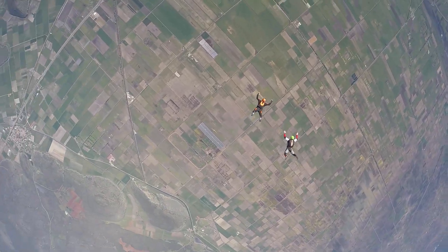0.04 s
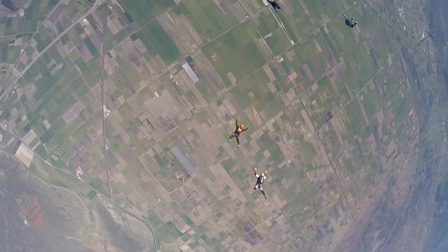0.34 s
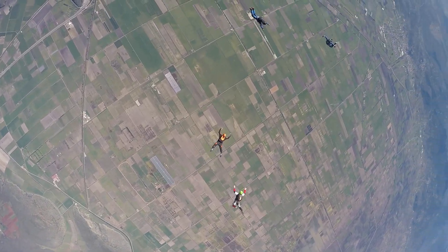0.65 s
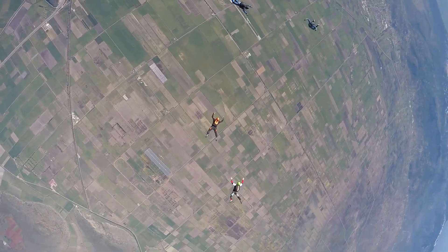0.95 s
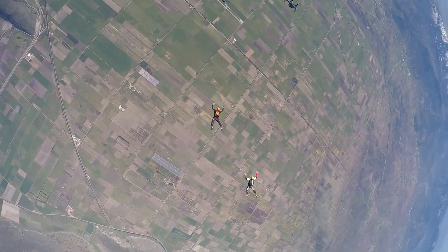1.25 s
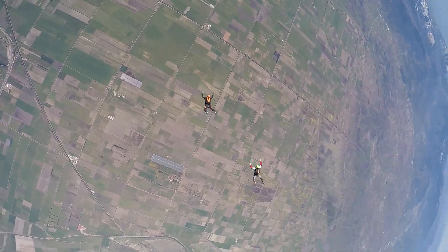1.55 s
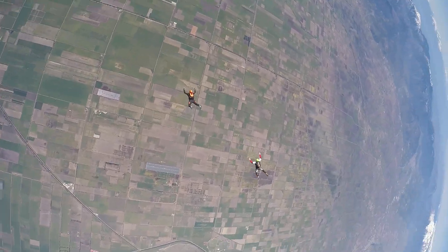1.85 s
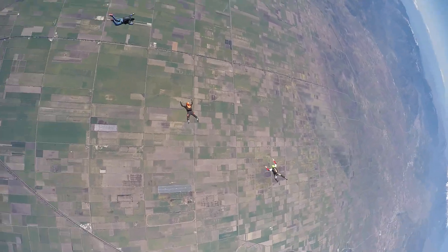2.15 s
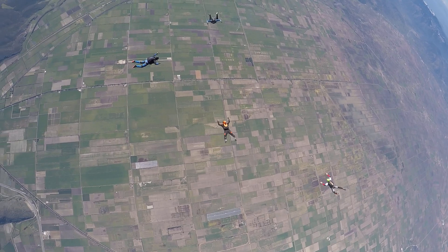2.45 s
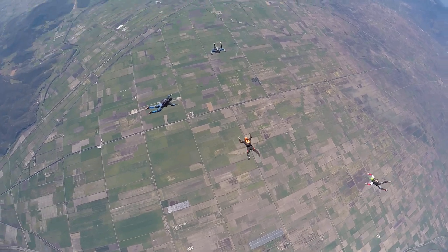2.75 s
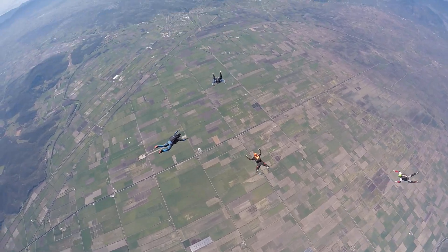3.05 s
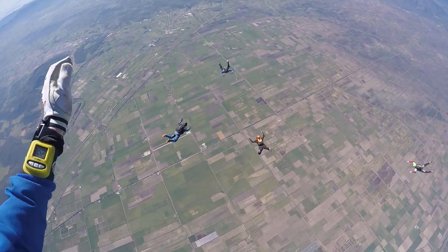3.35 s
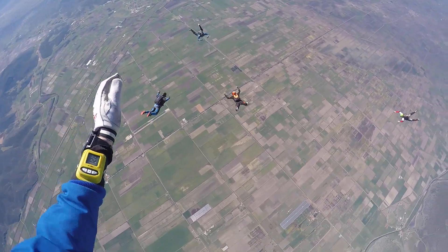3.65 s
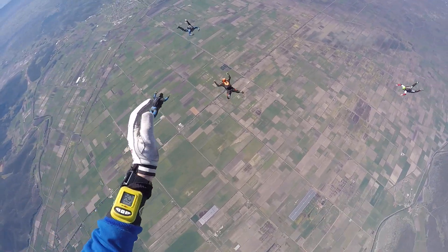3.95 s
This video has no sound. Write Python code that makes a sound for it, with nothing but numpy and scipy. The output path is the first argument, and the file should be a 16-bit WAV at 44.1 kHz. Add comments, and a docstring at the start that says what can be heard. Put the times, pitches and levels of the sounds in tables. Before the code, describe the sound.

Rushing freefall wind buffets the microphone with a deep rumble, broad roar and whistling hiss.

```python
"""A deep rumble and a broad roar of wind: air is rushing past a skydiver's camera in freefall.
Swirls of air shake the case, the stream makes a small hollow at the microphone ring near 3 kHz,
and the finest swirls add a hiss on top. As the diver turns, the roar swells and the ringing
breaks up into sputtering bursts, then drops away."""
import sys
import numpy as np
from scipy import signal
from scipy.fft import rfft, irfft
from scipy.io import wavfile
from scipy.ndimage import uniform_filter1d, minimum_filter1d

SR = 44100
rng = np.random.default_rng(int(sys.argv[2]) if len(sys.argv) > 2 else 0)


def materialize(psi):
    """Save the field psi as 16-bit PCM at rate SR to the path in sys.argv[1].

    A 1-D psi becomes a single channel; in a 2-D psi each row is a channel.
    """
    bounded = np.clip(np.atleast_2d(psi).T, -1, 1)
    quanta = np.round(bounded * 32767).astype(np.int16)
    wavfile.write(sys.argv[1], SR, quanta)


N = 176400  # 4 seconds

# Tone of the ringing hollow, how strong each pitch is: pitch_hz, level_db
HOLLOW_TONE = [(500, -48), (1600, -21.5), (2000, -18.5), (2200, -8), (2430, -3.5), (2700, -3), (2900, -2.2),
               (3200, -1.5), (3500, -8.5), (3900, -16), (4350, -25), (6000, -34.5), (9000, -51)]
# The pitch at which the hollow rings most: pitch_hz, width_hz, boost_db
HOLLOW_PEAKS = [(2900, 130, 2)]
HOLLOW_STEADINESS = 0.7  # 0 leaves random swells alone, 1 evens them out
SWIRL_HZ, SPUTTER_HZ, GRAIN_HZ = 52, 47, 410  # how fast each kind of flutter moves


def from_db(db):
    """Turn decibels into a number to multiply the sound by."""
    return 10 ** (np.asarray(db) / 20)


def unit_power(x):
    """Scale a signal so that its average power is 1."""
    return x / np.sqrt(np.mean(x ** 2) + 1e-20)


def curve(rows):
    """Join (time_s, value) points with straight lines, giving a value for every sample."""
    return np.interp(np.arange(N) / SR, *np.transpose(rows))


def drift(rate_hz):
    """A smooth random wander about 1 in size, worked out at every 8th sample."""
    pole = np.exp(-16 * np.pi * rate_hz / SR)
    noise = rng.standard_normal(N // 8 + 2002)
    slow = signal.lfilter([1], [1, -2 * pole, pole * pole], noise)[2000:]  # skip the settling time
    return np.interp(np.arange(N) / 8, np.arange(len(slow)), unit_power(slow))


def flutter(depth_db, rate_hz):
    """Passing swirls push the level up and down; the average power stays about the same."""
    spread = depth_db * np.log(10) / 20
    swirls = 2 * np.tanh(drift(rate_hz) / 2)  # a swirl can only be so strong
    return np.exp(spread * swirls - .75 * spread ** 2)


def air_noise(tone, drive=1, peaks=()):
    """Churning air: noise whose strength follows the drive, shaped by a tone and narrow peaks."""
    hz = np.maximum(np.arange(N // 2 + 1) * SR / N, 1)
    pitch_hz, level_db = np.transpose(tone)
    db = np.interp(np.log(hz), np.log(pitch_hz), level_db)
    for centre_hz, width_hz, boost_db in peaks:
        db = db + boost_db / (1 + (2 * (hz - centre_hz) / width_hz) ** 2)
    spectrum = rfft(drive * rng.standard_normal(N))
    low_cut = hz / np.hypot(hz, 10)  # fades out below 10 Hz
    return unit_power(irfft(spectrum * from_db(db) * low_cut, N))


def steadied(x, window_s, steadiness):
    """Partly even out swells slower than the window; quicker ones stay."""
    power = uniform_filter1d(x ** 2, int(window_s * SR)) + 1e-12
    return unit_power(x / power ** (steadiness / 2))


def rumble():
    """Large swirls shake the case without pause, so the lumpy bass keeps a fairly even strength."""
    # Tone of the shaking: pitch_hz, level_db
    tone = [(10, -20), (20, -4), (32, 3), (60, 0.4), (95, -1.2), (127, 0), (148, -14), (185, -22.5),
            (270, -33), (600, -66)]
    # How hard the air shakes the case: time_s, level_db
    shaking = [(0, -16.5), (.2, -17.5), (.36, -15), (.5, -18.5), (.8, -20.5), (1.1, -24.5), (1.4, -19),
               (1.7, -19.5), (2.2, -18.5), (2.33, -16), (2.43, -19.5), (2.57, -13), (3, -15.5), (3.25, -14),
               (3.5, -12), (3.75, -19), (4, -17)]
    lumps = steadied(air_noise(tone), window_s=0.111, steadiness=0.69)
    return lumps * flutter(depth_db=0.4, rate_hz=SWIRL_HZ) * from_db(curve(shaking))


def roar():
    """Churning air roars over a wide range of pitches, with peaks near 200 Hz and 1.5 kHz."""
    # Tone of the roar: pitch_hz, level_db
    tone = [(60, -5), (170, 4), (220, 3.5), (330, -1.5), (480, -1.5), (700, -5.5), (1050, -2), (1220, -1.5),
            (1500, 3.5), (1950, -2), (2400, -2), (2900, -1.5), (3250, -5), (3650, -17), (4050, -11),
            (5000, -23), (9000, -36)]
    # How the churning swells and fades: time_s, relative_level_db
    churning = [(0, -24.5), (.2, -25), (.36, -27.5), (.55, -33), (.97, -37.5), (1.14, -36.5), (1.45, -29.5),
                (1.9, -30), (2.2, -26.5), (2.42, -22.5), (2.58, -17), (2.7, -19.5), (2.85, -23), (3.3, -20),
                (3.52, -24), (4, -24.5)]
    drive = flutter(depth_db=1.3, rate_hz=SWIRL_HZ)
    return air_noise(tone, drive) * from_db(2.5 + curve(churning))


def hollow_ring():
    """Grainy airflow rings the hollow, steadily at first, later in fits."""
    # Strength of the flow across the hollow: time_s, relative_level_db
    flow = [(0, -20), (.25, -17), (.5, -14.5), (.85, -14.5), (1.05, -16.5), (1.4, -16.5), (1.75, -16),
            (2.25, -16.5), (2.6, -21), (2.82, -19.5), (2.97, -27), (3.15, -24.5), (3.3, -23.5), (3.4, -18),
            (3.55, -20), (3.66, -23), (3.72, -36.5), (4, -36)]
    # How unsteady that flow is (further from 0 is rougher): time_s, depth_db
    sputter = [(0, 1.2), (2.4, 1.4), (2.75, 5.5), (3.6, 3), (4, -9)]
    drive = flutter(depth_db=1.5, rate_hz=GRAIN_HZ) * flutter(curve(sputter), SPUTTER_HZ)
    ringing = air_noise(HOLLOW_TONE, drive, HOLLOW_PEAKS)
    ringing = steadied(ringing, window_s=0.074, steadiness=HOLLOW_STEADINESS)
    return ringing * from_db(curve(flow) - 1)


def hiss():
    """The finest swirls hiss along the case and make it ring; the tone shifts as the diver turns."""
    # Tone of the hiss, facing down and after the turn: pitch_hz, level_db
    down_tone = [(1500, -0.5), (4000, 11.5), (4350, 5.5), (5100, 5.5), (5700, 5.5), (6700, 1), (7750, -1.5),
                 (9100, 1), (10200, 2), (11200, -2.5), (12650, -.3), (13400, -11), (15200, -11)]
    turned_tone = [(1500, -1), (4000, 16.5), (4350, 14), (5300, 4), (6000, 6), (6800, 6), (7750, 0),
                   (9100, 1.5), (10300, 2), (11300, -0.5), (12700, 1), (13800, -10), (15200, -18)]
    # Narrow peaks and dips that the case adds in each position: pitch_hz, width_hz, boost_db
    down_peaks = [(4640, 210, 9.5), (4950, 140, 3.5), (6310, 210, 5.5), (6600, 200, -3), (8070, 200, 2.5),
                  (8570, 200, -4)]
    turned_peaks = [(4090, 93, -0.5), (4670, 100, 4.5), (7240, 150, 6), (7700, 270, -1), (8070, 380, 5.5),
                    (8540, 170, -3)]
    # How the hiss swells and fades: time_s, relative_level_db
    strength = [(0.0, -37.5), (0.37, -35), (0.67, -38), (0.95, -41.5), (1.08, -37.5), (2.25, -34.5),
                (2.44, -37), (2.67, -35.5), (2.88, -38), (3.22, -35.5), (3.59, -39.5), (4.0, -34.5)]
    turn_start_s, turn_end_s = 1.5, 3.1
    turn = curve([(turn_start_s, 0), (turn_end_s, 1)])
    drive = flutter(depth_db=0.63, rate_hz=SWIRL_HZ) * flutter(depth_db=1.24, rate_hz=GRAIN_HZ)
    facing_down = np.sqrt(1 - turn) * air_noise(down_tone, drive, down_peaks)
    turned = np.sqrt(turn) * air_noise(turned_tone, drive, turned_peaks)
    return (facing_down + turned) * from_db(5.5 + curve(strength))


def hollow_bursts():
    """For a few milliseconds the stream catches the hollow fully and rings it hard."""
    # Moments when the stream catches: peak_s, level_db
    catches = [(2.650, -19), (2.681, -17), (2.715, -12), (2.781, -12), (2.847, -16), (3.093, -13.5),
               (3.214, -15), (3.251, -11.5), (3.360, -9), (3.404, -9), (3.485, -10.5), (3.508, -12.5),
               (3.544, -13), (3.566, -10), (3.638, -16), (3.661, -17.5)]
    rise_s, fall_s = 0.0022, 0.0036
    t = np.arange(N) / SR
    loudness = np.zeros(N)
    for peak_s, level_db in catches:
        from_peak = np.maximum((peak_s - t) / rise_s, (t - peak_s) / fall_s)
        loudness += from_db(level_db) * np.exp(-np.minimum(from_peak ** 2, 60) / 2)  # a smooth bump
    ringing = air_noise(HOLLOW_TONE, peaks=HOLLOW_PEAKS)
    return steadied(ringing, rise_s + fall_s, HOLLOW_STEADINESS) * loudness


def scene():
    """All the wind sounds added together at one microphone."""
    return (rumble() + roar() + hollow_ring() + hollow_bursts() + hiss())[None, :]


def record(dry):
    """A fast limiter turns down the loudest peaks, then the highest treble is cut off."""
    limit, window_s, cutoff_hz = .9, .003, 15150
    span = int(window_s * SR)
    needed_gain = limit / np.maximum(np.abs(dry), limit)
    smooth_gain = uniform_filter1d(minimum_filter1d(needed_gain, span), span)
    treble_cut = signal.ellip(14, .1, 90, cutoff_hz, fs=SR, output="sos")
    return signal.sosfilt(treble_cut, dry * smooth_gain)


dry = scene()
out = record(dry)
materialize(out)
```